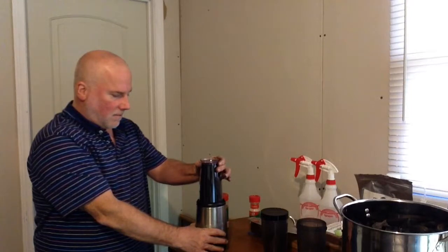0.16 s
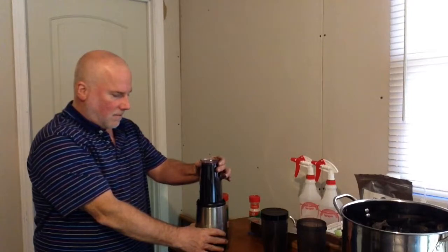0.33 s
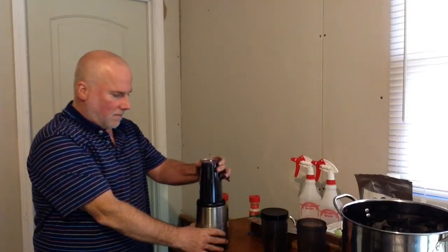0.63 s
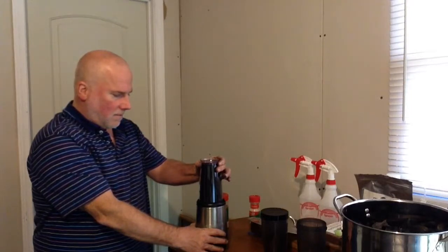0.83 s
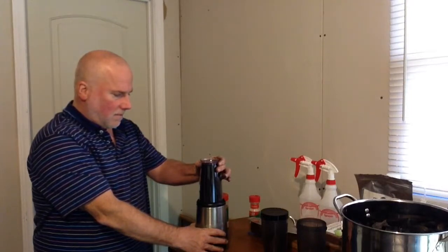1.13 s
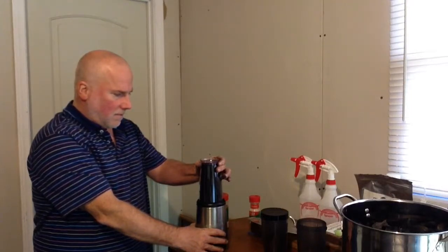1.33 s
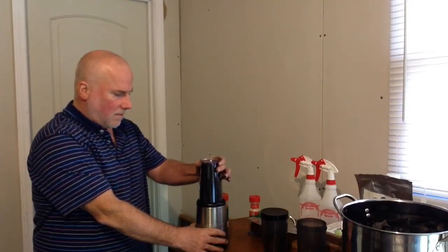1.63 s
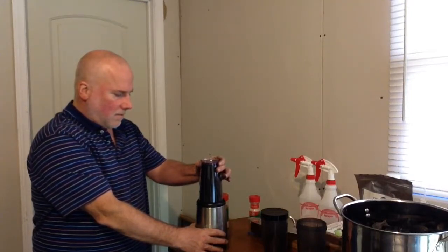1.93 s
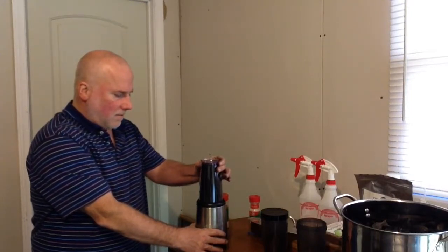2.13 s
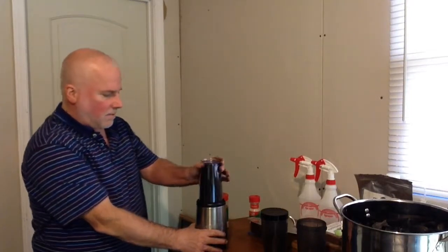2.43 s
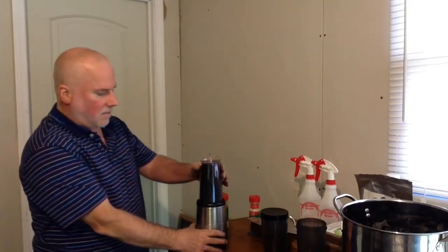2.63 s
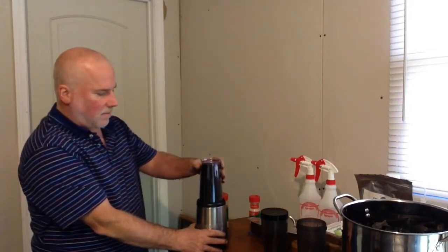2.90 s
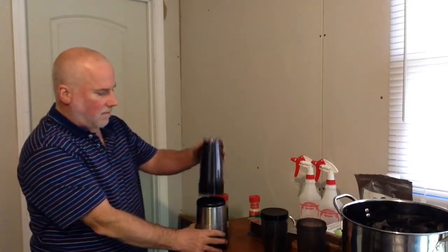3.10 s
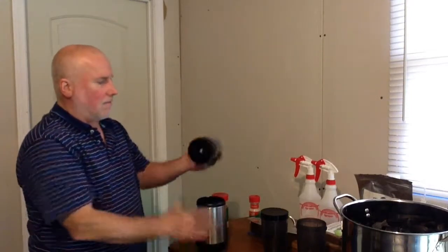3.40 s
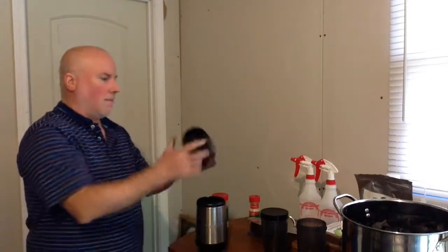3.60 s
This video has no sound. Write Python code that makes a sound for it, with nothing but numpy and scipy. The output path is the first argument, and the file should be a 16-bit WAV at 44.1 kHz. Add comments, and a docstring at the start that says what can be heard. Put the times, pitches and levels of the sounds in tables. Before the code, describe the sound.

A small blender loudly grinds charcoal, with chunks cracking, rattling and hissing as grit on a table in a small room. It dies away with a blade ping, then the plastic cup is softly twisted off and powder trickles.

```python
"""Grinding charcoal in a small blender

On a table in a little room, chunks crack on the blade, rattle round the cup and shake the base,
while fine grit sprays. The grinding dies away as the motor runs down, and the last chunks ring
the blade. Then the cup is twisted off and handled, with powder trickling inside."""
import sys
import numpy as np
from scipy import signal
from scipy.fft import rfft, irfft
from scipy.io import wavfile
from scipy.ndimage import uniform_filter1d, minimum_filter1d, map_coordinates

SR = 44100
rng = np.random.default_rng(int(sys.argv[2]) if len(sys.argv) > 2 else 0)


def wrap_up_sound(samples):
    """Save the sound to the file named by the first command line argument, as 16-bit audio."""
    columns = np.atleast_2d(samples).T
    # keep every value between -1 and 1, then stretch to whole-number steps
    tamed = np.clip(columns, -1, 1)
    steps = np.round(tamed * 32767).astype(np.int16)
    wavfile.write(sys.argv[1], SR, steps)


N = 165375
T = np.arange(N) / SR
CHUNK_FALL_DB_S, RATTLE_FALL_DB_S, SHAKE_FALL_DB_S = 203, 174, 213  # fading as the motor stops
CHUNKS_PER_S, GRIT_PER_S, KNOCKS_PER_S = 5000, 7000, 1500

# tone of the blender's base: pitch_hz, level_db
BASE_TONE = [(30, -62.5), (135, -54), (240, -20), (310, -3), (430, -0.5), (650, -5.5), (900, -7.5),
             (2000, -29), (8000, -56.5)]


def undb(db):
    """Turn decibels into a gain to multiply by."""
    return 10 ** (np.asarray(db) / 20)


def unit(x):
    """Scale a sound to an average (rms) level of 1."""
    return x / np.sqrt(np.mean(x ** 2))


def walk(rate):
    """A smooth random wander, about 1 in size."""
    step = int(SR / rate)
    return unit(uniform_filter1d(np.repeat(rng.standard_normal(N // step + 1), step), step)[:N])


def colour(x, tone, modes=()):
    """Give a sound a broad tone, plus narrow peaks (modes) where an object rings."""
    size = 2 ** 18
    f = np.arange(size // 2 + 1) * SR / size + 1e-3
    hz, db = np.array(tone).T
    shape = undb(np.interp(np.log(f), np.log(hz), db))
    lift = 1 + sum((undb(2 * up) - 1) / (1 + (2 * (f - pitch) / width) ** 2) ** 1.5
                   for pitch, width, up in modes)
    cepstrum = irfft(np.log(shape) + np.log(np.maximum(lift, 1e-2)) / 2)
    # make the ringing come after each hit, never before it
    cepstrum[1:size // 2] *= 2
    cepstrum[size // 2 + 1:] = 0
    return irfft(rfft(x, size) * np.exp(rfft(cepstrum)))[:N]


def impacts(rate, spread_db):
    """Random clicks, rate per second; spread_db sets how much their sizes differ."""
    hit = rng.random(N) < rate / SR
    size = np.minimum(rng.exponential(size=N), 4)
    sign = rng.choice([-1, 1], N)
    return unit(hit * sign * undb(spread_db * size))


def follow(curve, fall_db_s):
    """A gain that follows a level curve and dies away after its last point."""
    times, db = np.array(curve).T
    return undb(np.interp(T, times, db) - fall_db_s * np.maximum(T - times[-1], 0))


def bursts(rows):
    """A gain made of bursts that each rise, hold and fade."""
    return sum(undb(db) * np.clip((T - start) / rise, 0, 1)
               * np.exp(-2 * np.maximum(T - start - rise - hold, 0) / release)
               for start, rise, hold, release, db in rows)


def fade(start, fade_s, rise_s=.0015):
    """A quick rise, and a fall of 60 dB over fade_s."""
    return np.clip((T - start) / rise_s, 0, 1) * 1000. ** (-np.maximum(T - start, 0) / fade_s)


def drift(x):
    """The shifting load bends the pitch by about 0.3 percent."""
    return map_coordinates(x, [np.arange(N) + np.cumsum(.003 * walk(5))], mode="mirror")


def swirling_load(turn_hz=25.07):
    """The charcoal circles the cup unevenly, so the level flutters."""
    angle = 2 * np.pi * np.cumsum(turn_hz * (1 + .15 * walk(12))) / SR
    return undb(np.sin(angle) + .5 * walk(30))


def cracking_chunks(swirl):
    """Chunks crack brightly on the blade, with a surge when a big one is caught."""
    # strength of the cracking: time_s, level_db
    levels = [(0, -11), (.13, -11), (.25, -9.5), (.385, -13), (.5, -10), (.785, -10.5), (.8, -14),
              (.85, -11.5), (.92, -14), (.94, -14.5), (1.07, -11), (1.45, -11.5), (1.59, -11.5),
              (1.64, -11), (1.8, -11.5), (1.88, -12.5), (2.06, -13), (2.12, -10.5), (2.28, -9.5),
              (2.37, -14), (2.52, -15.5), (2.59, -12), (2.66, -10), (2.71, -17.5), (2.77, -22)]
    # tone of a crack: pitch_hz, level_db
    tone = [(300, -63), (1500, -19), (2800, -11), (3500, -1.5), (4500, 1.5), (6300, 0.5), (7600, -8),
            (9300, -10.5), (11500, -24), (15500, -19.5)]
    # ringing of a crack: pitch_hz, width_hz, lift_db
    modes = [(3530, 49, 8.5), (3730, 25, 4.5), (3780, 16, 2.4), (4220, 16, 5.5), (4345, 38, 7.2),
             (4595, 20, 3.5), (4830, 29, 7.1), (5470, 8, 2.8), (5783, 27, 5), (6580, 30, 5)]
    # big chunks being crushed: start_s, hold_s, level_db
    big_chunks = [(.11, .03, -13), (.312, 0.022, -10.5), (.585, .045, -10), (.648, 0.039, -10.5),
                  (.862, 0.043, -9), (1.143, 0.038, -6.5), (1.635, 0.036, -12.5), (1.695, .05, -10),
                  (2.397, .045, -12), (2.592, 0.015, -13)]
    cracks = unit(colour(swirl * impacts(CHUNKS_PER_S, spread_db=2), tone, modes))
    surges = unit(colour(impacts(2200, spread_db=-.5), tone, modes))
    caught = bursts((start, .011, hold, .018, db) for start, hold, db in big_chunks)
    return undb(-2) * (cracks * follow(levels, CHUNK_FALL_DB_S) + surges * caught)


def rattling_cup(swirl, wall_growth_db_s=5.5):
    """Chunks rattle in the hollow cup, whose wall rings more freely as they turn to powder."""
    # strength of the rattle: time_s, level_db
    levels = [(0, -14.5), (.52, -14), (.57, -12), (.66, -12), (.74, -15), (.785, -14.5), (.802, -22),
              (.85, -13), (.92, -13), (.94, -21.5), (.98, -14.5), (1.25, -14.5), (1.3, -13), (1.53, -16),
              (1.68, -13.5), (2.08, -17), (2.22, -14.5), (2.5, -19), (2.58, -19), (2.62, -16),
              (2.68, -19.5), (2.78, -28)]
    # tone of the cup's wall: pitch_hz, level_db
    wall_tone = [(300, -69.5), (1500, -24.5), (1850, -6.5), (2090, 1), (2400, -11), (2900, -24.5),
                 (15000, -68)]
    # tone of the hollow cup: pitch_hz, level_db
    cup_tone = [(100, -63), (200, -48.5), (550, -14), (850, -7.5), (1400, -3.5), (2200, 0), (2800, -1.5),
                (4000, -7.5), (7000, -17.5), (15000, -38.5)]
    # ringing of the cup: pitch_hz, width_hz, lift_db
    modes = [(993, 29, 7), (1497, 13, 8.1), (2399, 33, 7), (3080, 57, 7.8)]
    wall = unit(colour(swirl * impacts(CHUNKS_PER_S, spread_db=2), wall_tone))
    wall *= undb(-20 + wall_growth_db_s * T)
    hollow = unit(colour(swirl * impacts(CHUNKS_PER_S, spread_db=2), cup_tone, modes))
    return (undb(-1.5) * drift(hollow) + wall) * follow(levels, RATTLE_FALL_DB_S)


def spraying_grit(swirl):
    """Tiny hits of grit blend into a hiss, with a puff when a chunk shatters."""
    # strength of the spray: time_s, level_db
    levels = [(0, -12), (.08, -20), (.13, -15), (.2, -20), (.3, -14.5), (.4, -20.5), (.65, -14), (.73, -18),
              (.87, -15), (.99, -18.5), (1.14, -16), (1.25, -20.5), (1.42, -19), (1.85, -20), (2.25, -20),
              (2.46, -20.5), (2.52, -24), (2.62, -18.5), (2.7, -29.5), (2.74, -33.5)]
    # tone of the spray: pitch_hz, level_db
    spray_tone = [(500, -40), (3000, -9), (6000, 1), (8200, -1), (9200, 4), (11500, 0.5), (15500, -2.5)]
    # shattering chunks: start_s, rise_s, hold_s, release_s, level_db
    shatters = [(.778, 0.015, 0.028, .045, -10.5), (1.465, .015, .03, 0.046, -19.5),
                (1.985, 0.0043, .012, 0.022, -19), (2.055, 0.011, .075, .04, -18),
                (2.298, 0.0055, .02, .03, -18.5)]
    # tone of a puff: pitch_hz, level_db
    puff_tone = [(1000, -41), (4000, -13), (7000, -0.5), (9500, 1), (12500, 1), (15500, -4.5)]
    spray = unit(colour(swirl * impacts(GRIT_PER_S, spread_db=1.5), spray_tone))
    puffs = unit(colour(swirl * impacts(GRIT_PER_S, spread_db=1.5), puff_tone))
    return undb(.5) * spray * follow(levels, CHUNK_FALL_DB_S) + puffs * bursts(shatters)


def shaking_base(knocks):
    """Knocks from the chunks make the base ring with low notes."""
    # strength of the shaking: time_s, level_db
    levels = [(0, -20.5), (.78, -20.5), (.802, -23), (.84, -22.5), (1.05, -20.5), (1.33, -19.5), (1.5, -22),
              (2.18, -22), (2.26, -24.5), (2.48, -22), (2.52, -28), (2.72, -26.5), (2.83, -39)]
    # ringing of the base: pitch_hz, width_hz, lift_db
    modes = [(298.5, 16, 6.5), (353, 12, 5.5), (377.6, 12, 12.5), (412, 14, 6.5), (433.8, 11, 15),
             (494.8, 7.9, 15), (594, 29, 10), (610, 20, 13.5), (670.8, 20, 14)]
    return undb(-1.7) * drift(unit(colour(knocks, BASE_TONE, modes))) * follow(levels, SHAKE_FALL_DB_S)


def booming_table(knocks):
    """The same knocks make the table top boom."""
    # strength of the boom: time_s, level_db
    levels = [(0, -50), (.18, -55), (.21, -47), (.42, -48.5), (.48, -50), (2.07, -47), (2.29, -38),
              (2.45, -40), (2.49, -49), (2.62, -46.5), (2.8, -48)]
    # tone of the table top: pitch_hz, level_db
    tone = [(30, -54), (120, -46.5), (160, -6), (200, -8.5), (240, -0.5), (330, -15.5), (600, -42),
            (8000, -69.5)]
    # ringing of the table top: pitch_hz, width_hz, lift_db
    modes = [(175, 18, 8)]
    return unit(colour(knocks, tone, modes)) * follow(levels, SHAKE_FALL_DB_S)


def background():
    """Quiet room air with a low appliance hum."""
    # notes of the hum: pitch_hz, level_db
    notes = [(87, -76.5), (130, -78.5), (177, -75)]
    # tone of the air: pitch_hz, level_db
    air_tone = [(18, -93), (45, -48), (75, -12.5), (154, -18), (211, -7), (374, -14.5), (1060, -18),
                (1600, -21.5), (15000, -23)]
    hum = sum(undb(db) * np.sqrt(2) * np.sin(2 * np.pi * (hz * T + rng.random())) for hz, db in notes)
    return hum + undb(-60.5) * unit(colour(rng.standard_normal(N), air_tone))


def jammed_chunk(knocks):
    """A jammed chunk jolts the whole base."""
    # the jolt: start_s, rise_s, hold_s, release_s, level_db
    jolts = [(2.235, 0.0088, 0.039, .025, -20.5)]
    return unit(colour(knocks, BASE_TONE)) * bursts(jolts)


def ringing_blade():
    """Each strike gives a short crack and the steel blade rings; its highest notes fade first."""
    # last chunks hitting the blade: start_s, level_db
    pings = [(2.765, -17), (2.797, -36), (2.9, -48)]
    # tone of the crack: pitch_hz, level_db
    tone = [(80, -65), (700, -23), (3100, 11), (4300, -8), (6000, 1), (7500, -9), (15000, -14)]
    # clusters of close blade notes: pitch_hz, width_hz, level_db, fade_s
    clusters = [(3240, 310, -5.5, 0.32), (5970, 350, -1.5, 0.31), (9000, 520, -12, 0.22),
                (12000, 900, -18, 0.17)]
    strikes = lambda fade_s: sum(undb(db) * fade(start, fade_s) for start, db in pings)
    sound = undb(-1.5) * strikes(fade_s=.11) * unit(colour(rng.standard_normal(N), tone))
    for hz, width, db, fade_s in clusters:
        band = signal.butter(2, [hz - width / 2, hz + width / 2], "band", fs=SR, output="sos")
        sound += undb(db) * strikes(fade_s) * unit(signal.sosfilt(band, rng.standard_normal(N)))
    return sound


def handling_cup(knock_rise_s=.014):
    """The plastic cup knocks softly as it unlocks, and rubs on the base and in the hand."""
    # knocks of cup and hands: start_s, level_db, fade_s
    bumps = [(3.036, -47, 0.39), (3.125, -61.5, .2), (3.225, -60, .3), (3.655, -58.5, .3)]
    # tone of a knock: pitch_hz, level_db
    knock_tone = [(60, -34), (180, -6), (420, 2), (700, -9), (1400, -9), (2300, -7), (3500, -18),
                  (15000, -24)]
    # slides of the cup: start_s, rise_s, hold_s, release_s, level_db
    rubs = [(2.99, .07, .03, .05, -53), (3.422, 0.0084, 0.17, 0.076, -59.5), (3.664, .006, .05, .08, -63)]
    # tone of a slide: pitch_hz, level_db
    rub_tone = [(200, -2), (900, -14), (2200, 4), (3000, -3), (4200, 0.5), (7000, 1), (10000, 1.5),
                (15000, -8)]
    push = sum(undb(db) * fade(start, fade_s) * np.clip((T - start) / knock_rise_s, 0, 1)
               for start, db, fade_s in bumps)
    knocks = push * unit(colour(impacts(4000, spread_db=.5), knock_tone))
    slides = bursts(rubs) * unit(colour(impacts(3500, spread_db=-.5), rub_tone))
    return knocks + slides


def trickling_powder():
    """Powder trickles inside the cup as it is lifted and tipped."""
    # trickles: start_s, rise_s, hold_s, release_s, level_db
    trickles = [(3.052, .01, .03, .04, -53.5), (3.228, .008, .09, .05, -64.5),
                (3.452, .006, 0.12, .05, -59), (3.664, .003, .012, .04, -62)]
    # tone of the powder: pitch_hz, level_db
    tone = [(1000, -30), (5500, -16), (8500, 1), (11000, 0), (15000, -2)]
    return bursts(trickles) * unit(colour(impacts(2500, spread_db=2), tone))


def room(x, echo_db=-11):
    """The little room adds a short echo whose treble dies first."""
    t = T[:SR // 2]
    tail = 0
    for side, fade_s in (("low", .39), ("high", .16)):
        noise = rng.standard_normal(len(t)) * (t > .003)
        band = signal.butter(2, 6500, side, fs=SR, output="sos")
        tail += signal.sosfilt(band, noise) * 1000. ** (-t / fade_s)
    echo = signal.fftconvolve(x, tail / np.linalg.norm(tail))[:N]
    return (x + undb(echo_db) * echo) / np.hypot(1, undb(echo_db))


def scene():
    """Everything reaches one microphone, the same in both channels."""
    swirl = swirling_load()
    chunks = cracking_chunks(swirl)
    rattle = rattling_cup(swirl)
    grit = spraying_grit(swirl)
    knocks = impacts(KNOCKS_PER_S, spread_db=1.44)
    mix = shaking_base(knocks) + booming_table(knocks)
    mix += room(chunks + jammed_chunk(knocks)) + room(rattle) + room(grit, echo_db=-6.5)
    mix += ringing_blade()
    mix += room(handling_cup() + trickling_powder(), echo_db=-8.5)
    return np.tile(mix + background(), (2, 1))


def record(dry):
    """A fast limiter turns down the loudest peaks, then the highest treble is cut."""
    limit_db, window_s, top_hz = -.28, .0017, 15500
    size = int(window_s * SR)
    gain = np.minimum(1, undb(limit_db) / (np.abs(dry) + 1e-9))
    gain = uniform_filter1d(minimum_filter1d(gain, size), size)
    return signal.sosfilt(signal.ellip(12, .1, 80, top_hz, fs=SR, output="sos"), dry * gain)


dry = scene()
out = record(dry)
wrap_up_sound(out)
```